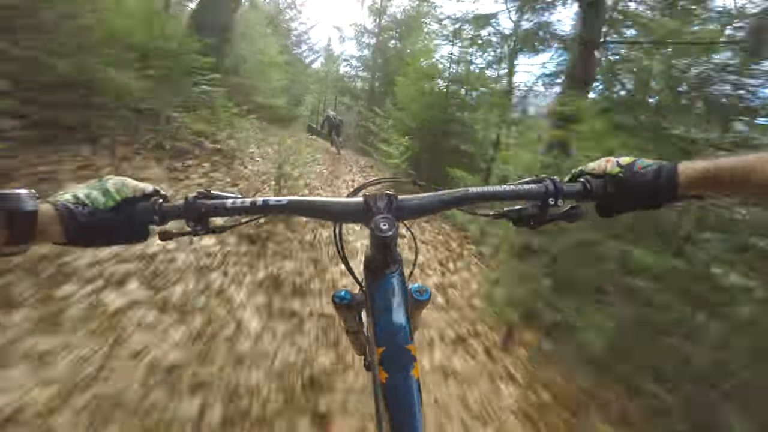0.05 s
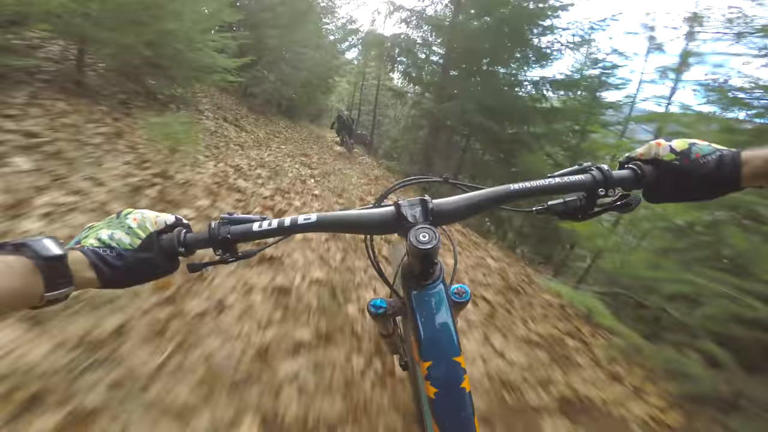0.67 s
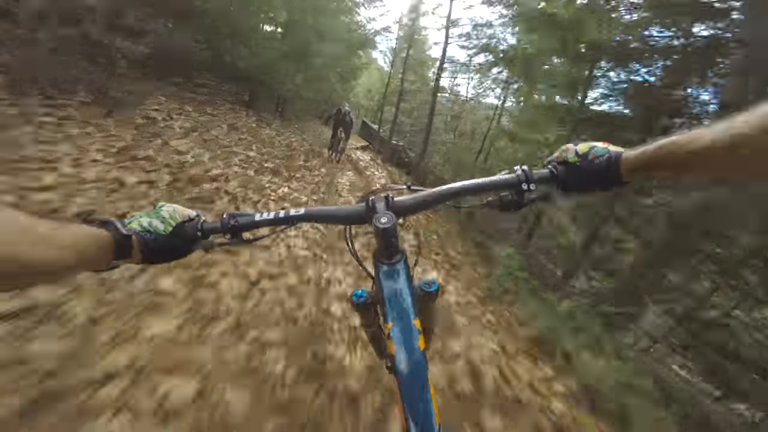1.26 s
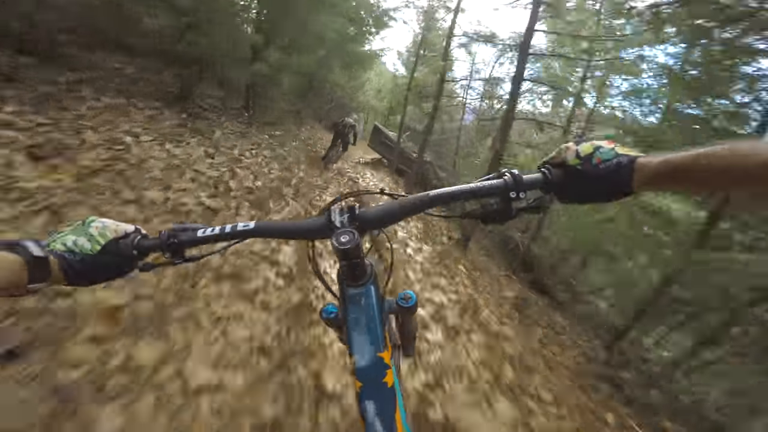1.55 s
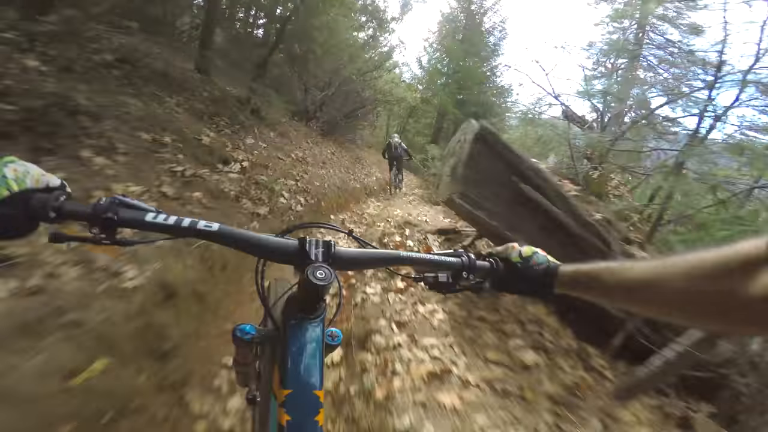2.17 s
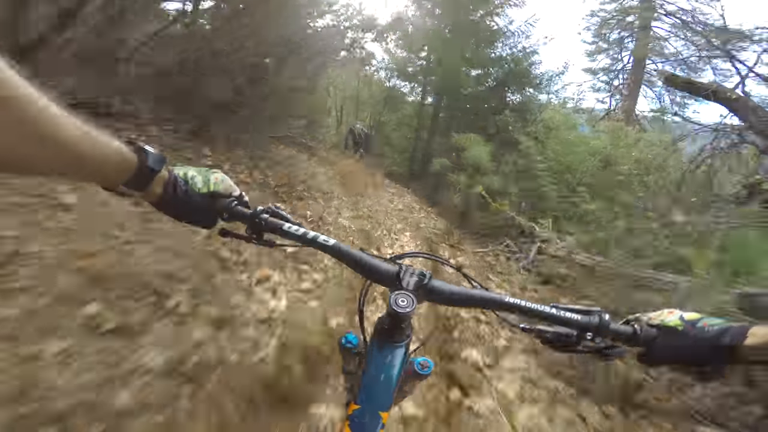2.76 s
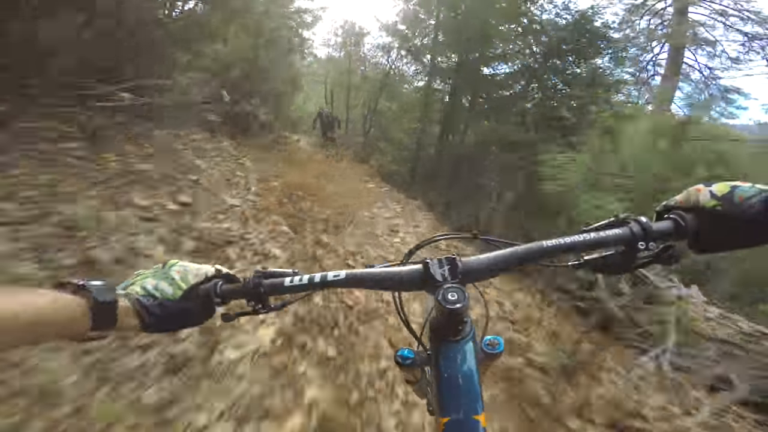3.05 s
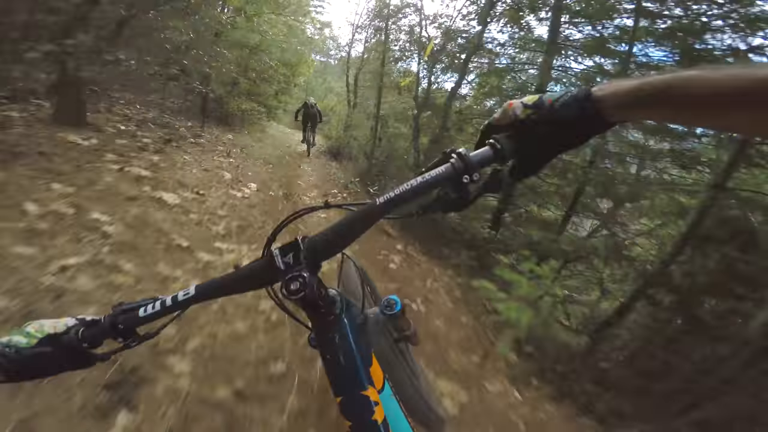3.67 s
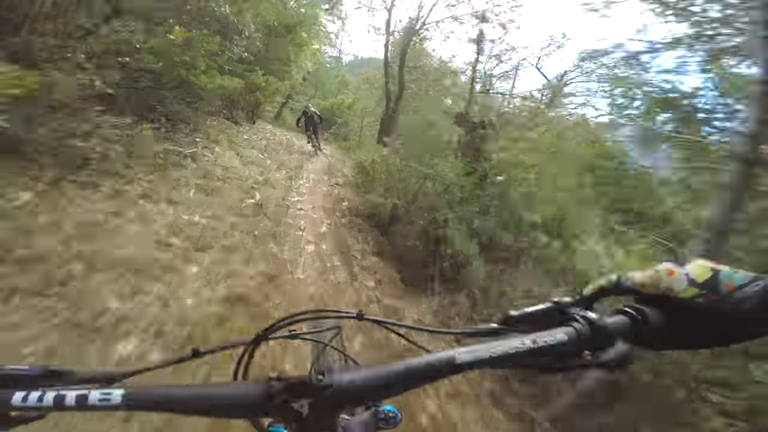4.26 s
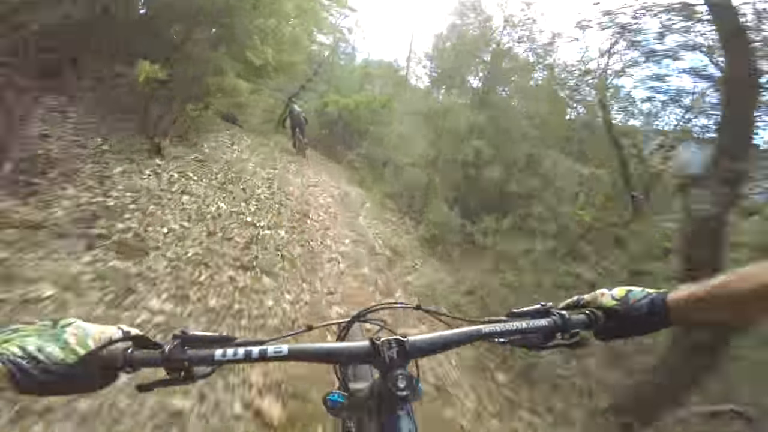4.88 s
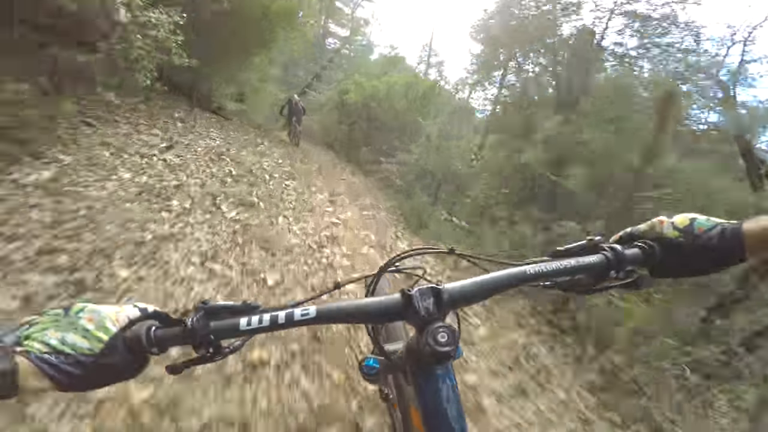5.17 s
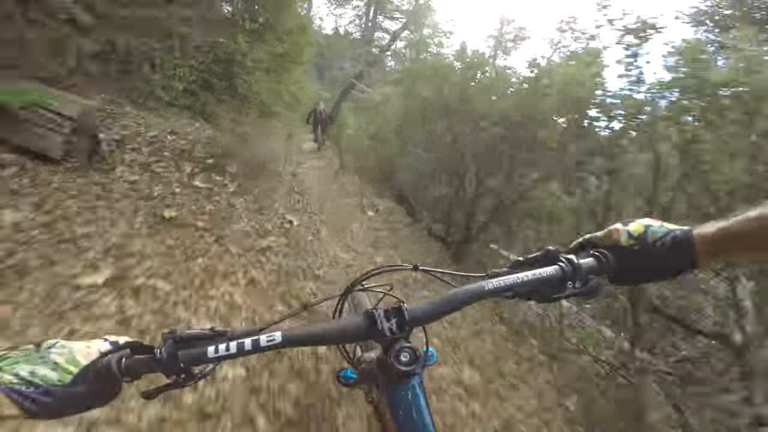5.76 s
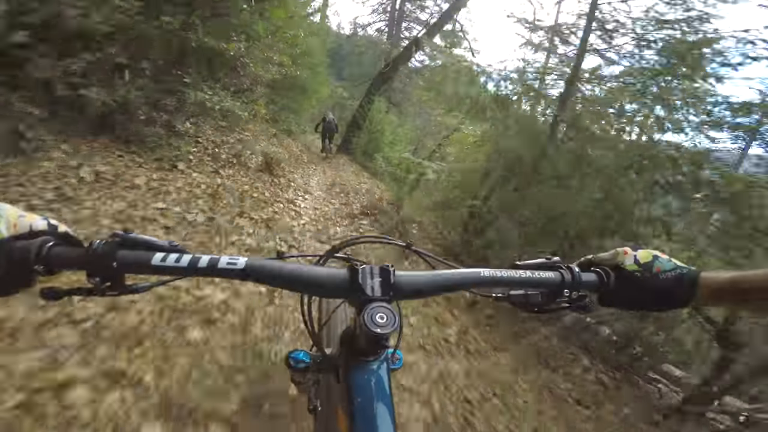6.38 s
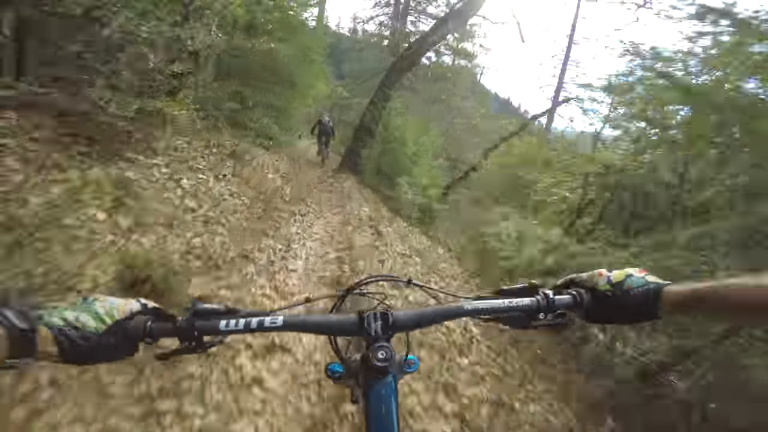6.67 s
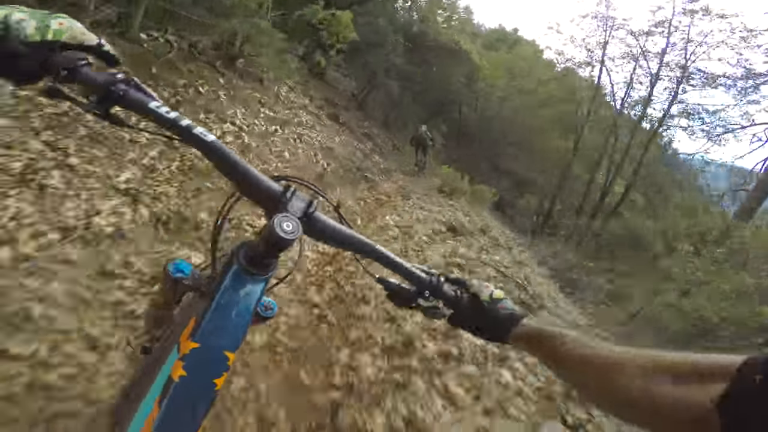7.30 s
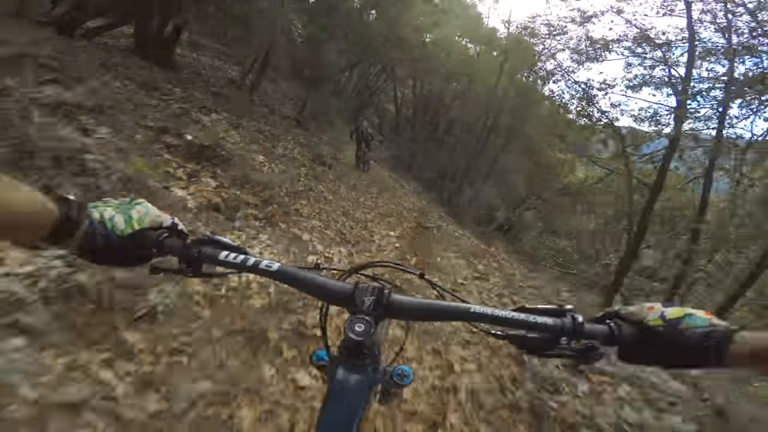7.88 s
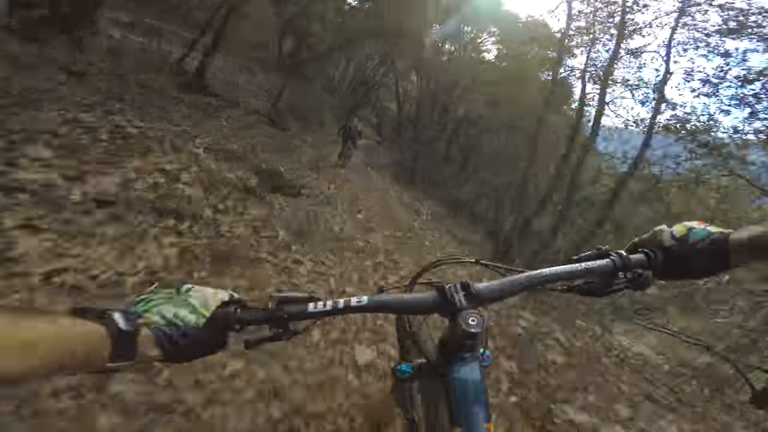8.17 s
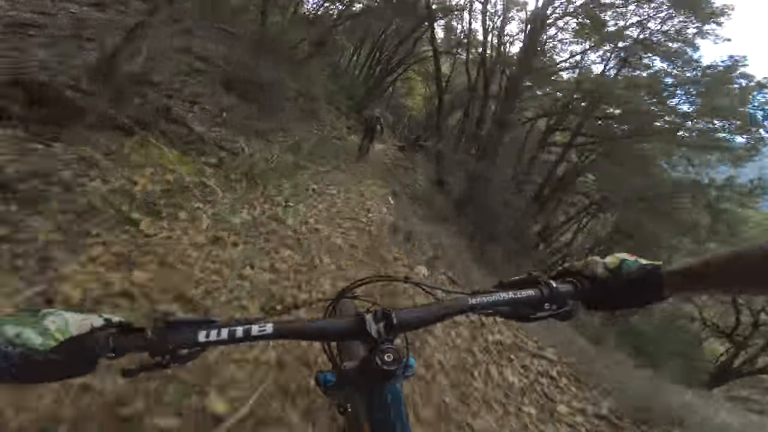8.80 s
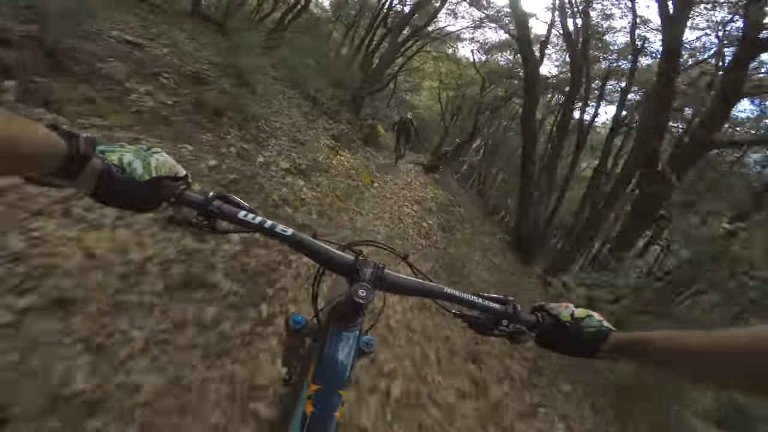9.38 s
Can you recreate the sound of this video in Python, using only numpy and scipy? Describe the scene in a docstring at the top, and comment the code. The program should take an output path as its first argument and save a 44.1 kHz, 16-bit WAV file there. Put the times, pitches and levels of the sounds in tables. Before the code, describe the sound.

A mountain bike races over dry leaves and grit, tyres crunching and chain slapping, while heavy wind buffets the microphone.

```python
"""On a leafy mountain trail, a bike runs fast downhill, heard from a camera on the rider's chest.
The head wind buffets the microphone all the way, in low swirls that break up into flutter.
Twigs snap, the chain slaps the frame, the wheels knock on roots and stones, and cables rattle.
The tyres crush dry leaves and grit: a crunch of tiny clicks that swells in skids and drops in hops."""
import sys
import numpy as np
from scipy import signal
from scipy.fft import rfft, irfft, next_fast_len
from scipy.io import wavfile
from scipy.ndimage import uniform_filter1d, map_coordinates

SR = 44100
rng = np.random.default_rng(int(sys.argv[2]) if len(sys.argv) > 2 else 0)


def waveform_to_disk(signal):
    """Save audio, clipped to [-1, 1], as 16-bit WAV at the path in sys.argv[1]."""
    frames = np.transpose(np.atleast_2d(signal))
    scaled = np.clip(frames, -1, 1) * 32767
    samples = np.round(scaled).astype(np.int16)
    wavfile.write(sys.argv[1], SR, samples)


N = 420713


def amp(db):
    """Turn decibels into a gain to multiply by."""
    return 10 ** (np.asarray(db) / 20)


def unit(x):
    """Scale a signal to an average (rms) level of 1."""
    return x / np.sqrt(np.mean(x ** 2) + 1e-20)


def curves(rows):
    """Join a table's rows with straight lines: one curve for each column after the time."""
    times, *columns = np.transpose(rows)
    return [np.interp(np.arange(N) / SR, times, column) for column in columns]


def wobble(rate):
    """A smooth curve through `rate` random values a second."""
    values = rng.standard_normal(int(N * rate / SR) + 4)
    return map_coordinates(values, [np.arange(N) * rate / SR])


def filtered(x, response):
    """Multiply each frequency in x by response(frequency)."""
    size = next_fast_len(len(x) + 8192)
    return irfft(rfft(x, size) * response(np.fft.rfftfreq(size, 1 / SR)), size)[:len(x)]


def coloured(x, tone):
    """Shape x with a table of (frequency [Hz], level [dB]), then scale it to level 1."""
    freqs, db = np.transpose(tone)
    gain = lambda hz: amp(np.interp(np.log(hz + 1), np.log(freqs), db, left=-120, right=-120))
    return unit(filtered(x, gain))


def ring(x, modes):
    """Let x shake an object that rings at a few pitches; little passes above the highest."""
    edge_hz = 0.85 * modes[-1][0]

    def response(f):
        body = sum((-1) ** k * amp(db) * 1j * f * width / (hz * hz - f * f + 1j * f * width)
                   for k, (hz, width, db) in enumerate(modes))
        return body / (1 + 1j * np.sqrt(2) * f / edge_hz - (f / edge_hz) ** 2)
    return filtered(x, response)


def clicks(rate, spread_db):
    """Random clicks, about `rate` a second; more spread makes their sizes more uneven."""
    chance, size = rng.random(N), rng.standard_normal(N)
    return (chance < rate / SR) * amp(spread_db * np.clip(size, -2, 2)) * rng.choice([-1, 1], N)


def burst(t60, tail_db, tail_t60):
    """A hard hit, then weaker chatter; each t60 is the seconds taken to fade by 60 dB."""
    t = np.arange(SR // 5) / SR
    return rng.standard_normal(len(t)) * (amp(-60 * t / t60) + amp(tail_db - 60 * t / tail_t60))


def jolts(rate, life_s, spread_db):
    """A loudness curve of small bumps: each starts at once and dies away."""
    t = np.arange(SR // 5) / SR
    return unit(signal.fftconvolve(np.abs(clicks(rate, spread_db)), np.exp(-t / life_s))[:N])


def add(track, s, db, sound):
    """Mix a sound in at s seconds, with its peak at db."""
    part = track[max(0, round(s * SR)):][:len(sound)]
    part += amp(db) * sound[:len(part)] / np.abs(sound).max()


# the deep tone of wind on the microphone: (frequency [Hz], level [dB])
BUFFET_TONE = [(8, -24), (15, 0.5), (27, 2.5), (42, 0), (60, -3.5), (85, -8.5), (120, -14.5), (170, -26),
               (280, -38.5)]
def eddies():
    """Small swirls of air follow one another, each about as strong as the last."""
    rumble = coloured(rng.standard_normal(N), BUFFET_TONE)
    strength = np.sqrt(np.abs(uniform_filter1d(rumble ** 2, size=2200)))
    return unit(rumble / (uniform_filter1d(strength, size=900) + 0.16))


# how hard the head wind blows: (time [s], level [dB])
WIND_STRENGTH = [(0, -22), (.6, -18), (1.5, -20.5), (2.25, -20), (2.9, -17.5), (3.15, -19.5), (3.7, -16),
                 (4.85, -20.5), (5.85, -17), (6.5, -18), (7.35, -19), (8.2, -18), (9.1, -19), (9.54, -17)]
# the wind lets go of the microphone for a moment: (time [s], level change [dB])
WIND_LULLS = [(.08, -14), (.58, -6), (1.78, 0), (2.24, -2), (3.1, -4.5), (4.39, -3.5), (4.96, -6.5),
              (5.31, -7.5), (6.07, -5.5), (6.46, -10), (7.02, -7), (7.33, -10), (7.9, -1.5), (8.36, -7),
              (9.2, -3)]
# the tone of fluttering air: (frequency [Hz], level [dB])
FLUTTER_TONE = [(80, -14), (135, 3.5), (185, 1), (250, -2.5), (320, -7.5), (450, -16), (640, -14.5),
                (850, -24.5), (1500, -25), (4000, -37)]
def wind(lull_s=0.041, flutter_db=-15):
    """Eddies push on the microphone, easing in each lull; the harder pushes flutter more."""
    strength_db, = curves(WIND_STRENGTH)
    t = np.arange(N) / SR
    lull_db = sum(db * np.exp(-((t - s) / lull_s) ** 2) for s, db in WIND_LULLS)
    push = eddies()
    breakup = unit((1 + np.abs(push)) * amp(3.16 * wobble(45) + 1.77 * wobble(12)))
    flutter = breakup * coloured(rng.standard_normal(N), FLUTTER_TONE)
    return amp(strength_db + lull_db) * (amp(3.0) * push + amp(flutter_db) * flutter)


# the strongest swirls to hit the microphone: (time [s], level [dB], frequency [Hz])
BIG_SWIRLS = [(.201, -6.5, 60), (0.357, -5, 35.7), (0.502, -6.5, 41.2), (0.663, -6, 103), (.71, -1.5, 55),
              (.901, -4.5, 41.4), (1.149, -5.5, 36.8), (1.36, -4.5, 79), (1.94, -3, 43),
              (2.091, -3.5, 38.4), (2.5, -4, 49.4), (2.968, -2, 44), (3.913, -3.5, 53.3), (4.091, -7.5, 68),
              (4.214, -6.5, 80), (4.278, -3, 48.5), (4.49, -1, 41), (4.599, -8, 50), (4.7, -1, 52.4),
              (5.188, -3, 42), (5.632, -4, 42), (5.98, -4, 68), (6.241, -6, 82), (6.651, -3.5, 47.3),
              (6.758, -10, 52.7), (7.198, -4.5, 50), (7.601, -1, 49.3), (7.948, -4, 38), (8.13, -2.5, 47),
              (8.29, -4.5, 50.7), (8.749, -3, 58), (8.859, -2, 47), (9.021, -6, 62), (9.388, -5.5, 58),
              (9.5, -5, 40)]
def swirls(fray_db=-24.5, fray_db_per_octave=11, typical_hz=50):
    """A passing swirl briefly pushes and pulls; its core frays into flutter, more so if it is fast."""
    track, fray = np.zeros(N), np.zeros(N)
    t = np.arange(-SR // 10, SR // 10) / SR
    fray_tone = [(80, -37), (135, 3.5), (260, -9), (450, -19.0), (1000, -54)]
    flutter = coloured(rng.standard_normal(N), fray_tone)
    for s, db, hz in BIG_SWIRLS:
        cycles = hz * t
        turn = 2 * np.pi * (cycles + rng.random())
        core = np.exp(-(cycles / 0.8) ** 2)
        steepening = 0.49 * core * np.sin(turn + 2 * np.pi * rng.random())
        add(track, s + t[0], db - 2.0, core * np.cos(turn + steepening))
        flutter_db = db + fray_db + fray_db_per_octave * np.log2(hz / typical_hz)
        add(fray, s + t[0], flutter_db, np.exp(-(t / 0.021) ** 2))
    return track + fray * flutter


# the tone of flying leaves: (frequency [Hz], level [dB])
SWISH_TONE = [(1500, -2), (4000, 2), (8000, -1), (11000, 4), (13000, 2), (15500, -4)]
def leaf_swish(at_s=3.355, top_db=-29.5, rise_db_per_s=134, fall_db_per_s=122):
    """Loose leaves sweep past in a dense, high hiss that swells and fades."""
    t = np.arange(N) / SR - at_s
    db = top_db + np.minimum(rise_db_per_s * t, -fall_db_per_s * t)
    return amp(db) * coloured(clicks(rate=5800, spread_db=6.5), SWISH_TONE)


# twigs break: (time [s], level [dB])
TWIG_SNAPS = [(2.381, -21), (4.261, -11.5), (6.7563, -9), (7.002, -22), (7.1, -16), (7.338, -14),
              (9.164, -13)]
def twig_snaps():
    """Dry twigs break with a very short crack, its highest treble softened."""
    track = np.zeros(N)
    for s, db in TWIG_SNAPS:
        crack = burst(t60=0.011, tail_db=-17, tail_t60=.03)
        add(track, s, db - 5, filtered(crack, lambda hz: 1 / (1 + 1j * hz / 7000)))
    return track


# how the chain rings: (pitch [Hz], width [Hz], level [dB]); a wider ring dies sooner
CHAIN_RING = [(1450, 380, -13), (1960, 320, -6.5), (2440, 180, -0.5), (3690, 640, 3.5), (4330, 590, 5),
              (5600, 1400, 0)]
# the chain hits the frame: (time [s], level [dB], brightness [dB per octave])
CHAIN_SLAPS = [(1.866, -19, -16), (2.38, -15, 1), (2.469, -22, -11), (2.6556, -12.5, -7),
               (2.8283, -20, -10), (3.771, -16, -12), (4.2036, -18, -19), (4.2227, -15.5, -6),
               (4.2337, -13.5, -1), (4.346, -13.5, -6), (4.3625, -12.5, -10), (6.1082, -21, -15),
               (6.5535, -17, -5), (7.1362, -18, -2), (7.285, -13, -10), (7.538, -13, -3), (7.5975, -10, -1),
               (7.615, -13, -6), (7.861, -20, -6), (9.188, -17, -20)]
def chain_slaps():
    """The chain strikes the frame and chatters, each slap with its own brightness."""
    track = np.zeros(N)
    for s, db, brightness in CHAIN_SLAPS:
        modes = [(hz, width, level + brightness * np.log2(hz / 3000) + 2 * rng.standard_normal())
                 for hz, width, level in CHAIN_RING]
        contact = burst(t60=.02, tail_db=-14, tail_t60=.07)
        add(track, s, db - 3.0, ring(contact, modes))
    return track


# how the frame rings: (pitch [Hz], width [Hz], level [dB])
FRAME_RING = [(650, 330, -5.5), (1156, 130, -4), (1840, 620, -6.5), (2430, 71, -5), (2920, 680, -10)]
# how the fork that holds the front wheel rings: (pitch [Hz], width [Hz], level [dB])
FORK_RING = [(193, 52, -0.5), (297, 150, -0.7), (493, 294, -1.6)]
# the wheels strike roots and stones: (time [s], level [dB], amount of thud [dB])
WHEEL_KNOCKS = [(0.332, -23, 18), (1.386, -17, 8), (2.467, -16, -8), (3.079, -20.5, 5), (4.038, -15.5, 1),
                (4.068, -15.5, 12), (4.509, -15.5, 5), (4.586, -16.5, -8), (4.634, -8.5, 4),
                (4.655, -17, -10), (4.701, -16, 12), (4.72, -18, -1), (6.753, -19, 4), (7.001, -16, 4),
                (7.273, -14, 2), (7.519, -18, 16), (8.141, -20, 8), (8.815, -17, 6)]
def wheel_knocks():
    """A blow on the wheel clacks in the frame and thuds in the fork."""
    track = np.zeros(N)
    for s, db, thud_db in WHEEL_KNOCKS:
        blow = burst(t60=.02, tail_db=-10, tail_t60=.12)
        thud = amp(thud_db + 5.5) * ring(blow, FORK_RING)
        add(track, s, db - 3.0, ring(blow, FRAME_RING) + thud)
    return track


# the bike hops off the ground: (take-off [s], touch-down [s])
BIKE_HOPS = [(4.77, 4.975), (6.85, 7.008)]
def airborne(lift_s=0.051, land_s=0.0044):
    """0 on the ground, 1 in the air: the tyres lift off gradually and land suddenly."""
    t = np.arange(N) / SR
    return sum(np.clip((t - up) / lift_s, 0, 1) * np.clip((down - t) / land_s, 0, 1)
               for up, down in BIKE_HOPS)


# how rough the trail is: (time [s], rattle level [dB])
ROUGHNESS = [(0, -50), (.6, -44.5), (3.3, -46.5), (4.1, -41), (4.65, -39), (4.85, -44), (6.1, -49.5),
             (6.9, -44.5), (7.5, -36.5), (8.2, -44), (9.54, -45.5)]
# how cables and levers ring: (pitch [Hz], width [Hz], level [dB])
CABLE_RING = [(1230, 590, -4.5), (1855, 175, 2), (2090, 420, 0), (2840, 200, -16), (3900, 400, -10)]
def rattle(hop_db=-6):
    """Rough ground keeps cables and levers chattering and the fork drumming, less so in a hop."""
    rough_db, = curves(ROUGHNESS)
    shaken = lambda rate, life_s: jolts(rate, life_s, spread_db=0.0) * rng.standard_normal(N)
    chatter = unit(ring(shaken(rate=130, life_s=0.0067), CABLE_RING))
    drumming = unit(ring(shaken(rate=70, life_s=0.0035), FORK_RING))
    return amp(rough_db + hop_db * airborne()) * (chatter + amp(2.0) * drumming)


# a tyre digs in on a bump or in a turn: (time [s], length [s], boost [dB], leaf change [dB])
TYRE_SKIDS = [(2.4, 0.034, 2.5, -2), (2.488, 0.047, 1, 9), (2.656, 0.036, 8, -1), (2.967, 0.065, 4.5, -1),
              (3.37, 0.09, 6.5, -1), (3.712, .04, 9.5, -1), (4.245, 0.074, 9.5, -8),
              (4.352, 0.026, 5.5, -9), (5.005, 0.035, 6, 1), (5.108, 0.055, 6.5, 0), (6.385, 0.03, 3.5, 3),
              (6.764, 0.026, 3, 5), (7.34, 0.037, 6.5, 2), (7.459, 0.095, 6.5, -2), (7.536, 0.05, 3.5, 4),
              (7.614, .08, 8, 4), (7.87, 0.028, 7.5, -2), (8.145, 0.047, 5.5, 3.5), (8.428, 0.021, 7, -3),
              (8.536, 0.035, 6.5, -8), (8.656, 0.18, 4.5, -1)]
def skids(rise_share=0.48, fall_share=0.54):
    """How many dB the crunch and its leaves change as a tyre digs in and lets go."""
    t = np.arange(N) / SR
    crunch_db, leaves_db = np.zeros(N), np.zeros(N)
    for s, length, boost_db, leaf_db in TYRE_SKIDS:
        near = np.abs(t - s) < 2 * length
        width_s = length * np.where(t[near] < s, rise_share, fall_share)
        swell = np.exp(-((t[near] - s) / width_s) ** 2)
        crunch_db[near] += boost_db * swell
        leaves_db[near] += leaf_db * swell
    return crunch_db, leaves_db


def patchy(x, depth_db):
    """Shift the tone from moment to moment, as each patch of ground sounds different."""
    spectra = signal.stft(x, nperseg=512)[2]
    patches = uniform_filter1d(rng.standard_normal(spectra.shape), size=5, axis=0)  # blur in pitch
    patches = uniform_filter1d(patches, size=5, axis=1)  # blur in time
    return unit(signal.istft(spectra * amp(depth_db * unit(patches)), nperseg=512)[1][:N])


# rolling, louder with speed and loose ground: (time [s], level [dB], leaf cover [dB])
ROLLING = [(0, -40, -2), (.75, -32, -1), (1.2, -33.5, 3), (1.38, -35.5, -3), (1.72, -35, 5.5),
           (2.2, -31.5, 1), (2.85, -34.5, -2.5), (3.6, -37, -0.5), (4.65, -39, 0), (5.15, -38, 2.5),
           (5.85, -37.5, 0.5), (6.1, -43, 2.5), (6.58, -32.5, 1.5), (7.05, -37, -2), (7.55, -32, -1.5),
           (8.05, -34, -0.5), (8.9, -37.5, -1), (9.4, -30.5, 1)]
# the tone of crushed grit: (frequency [Hz], level [dB])
GRIT_TONE = [(250, 3), (500, 3), (950, -5), (1300, -1.5), (1650, -1), (2100, -1), (2800, -2), (3900, -0.5),
             (4900, -6.5), (5700, -6), (7000, -13), (10000, -16), (15000, -37)]
# the tone of crushed dry leaves: (frequency [Hz], level [dB])
LEAF_TONE = [(2500, -16), (4500, 5.5), (6200, 3.5), (8300, -1.5), (10000, -1), (12000, -1), (14000, -6),
             (15500, -11.5)]
def tyres(hop_db=-7.5, grit_db=-1, leaf_db=-8.5):
    """The tread crushes grit and leaves in clumps, harder on bumps and in skids, less in a hop."""
    rolling_db, cover_db = curves(ROLLING)
    skid_db, thrown_db = skids()
    crunch_db = rolling_db + skid_db + hop_db * airborne()
    bumps = (3.0 + jolts(rate=60, life_s=0.0039, spread_db=1.5)) * amp(0.96 * wobble(24))
    load = lambda: bumps * amp(1.08 * wobble(70))
    grit = patchy(load() * coloured(clicks(rate=6000, spread_db=0.5), GRIT_TONE), depth_db=2.0)
    leaves = patchy(load() * coloured(clicks(rate=12000, spread_db=3), LEAF_TONE), depth_db=1.7)
    return amp(crunch_db) * (amp(grit_db) * grit + amp(leaf_db + cover_db + thrown_db) * leaves)


def scene():
    """Wind and bike, both close to the one microphone."""
    air = wind() + swirls()
    bike = tyres() + rattle() + leaf_swish() + chain_slaps() + wheel_knocks() + twig_snaps()
    return (air + bike)[None]


def record(dry):
    """The camera rounds off the highest peaks and cuts the very top of the treble."""
    ceiling, top_hz = .95, 15400
    rounded = dry[0] / (1 + np.abs(dry[0] / ceiling) ** 8) ** (1 / 8)
    return filtered(rounded, lambda hz: hz < top_hz)[None]


dry = scene()
out = record(dry)
waveform_to_disk(out)
```